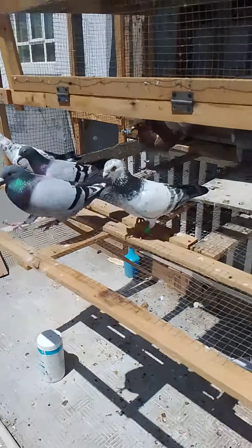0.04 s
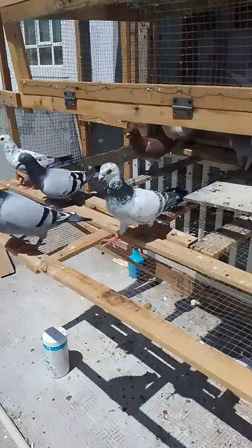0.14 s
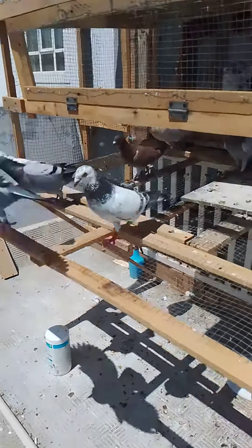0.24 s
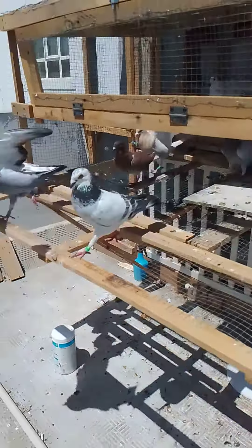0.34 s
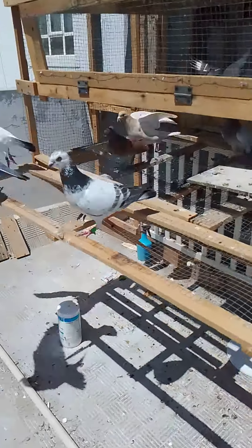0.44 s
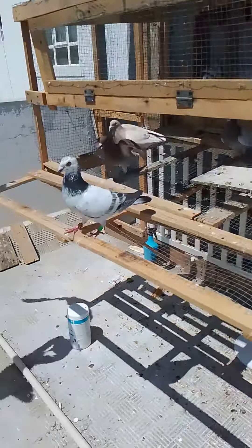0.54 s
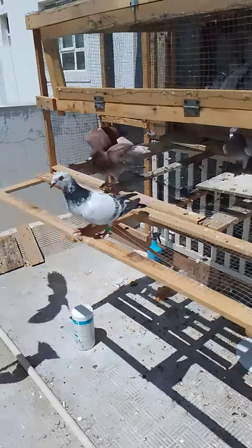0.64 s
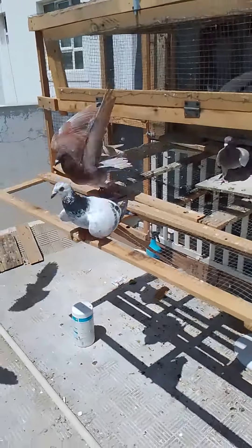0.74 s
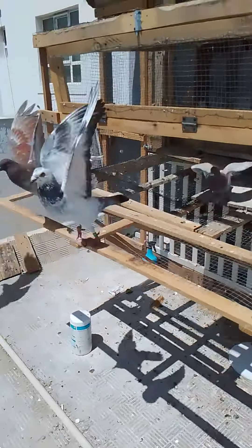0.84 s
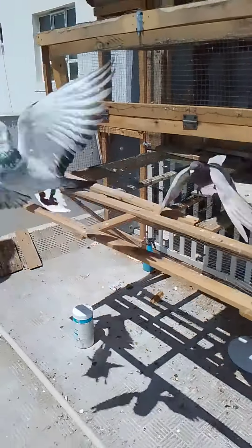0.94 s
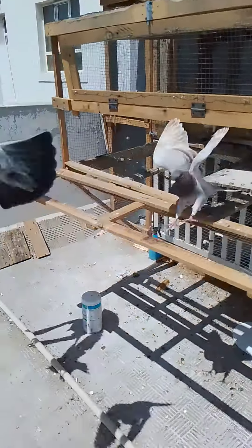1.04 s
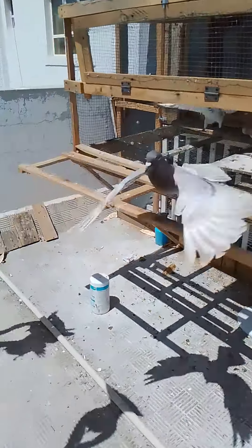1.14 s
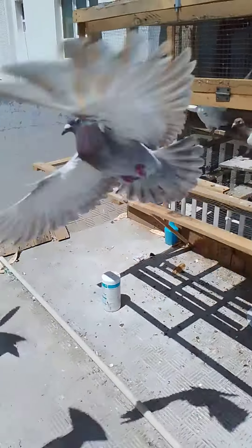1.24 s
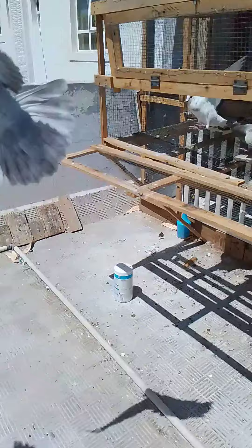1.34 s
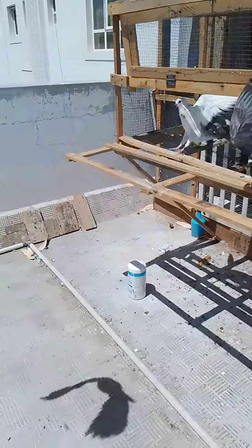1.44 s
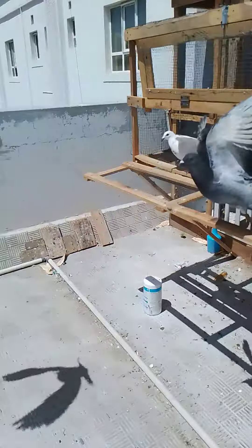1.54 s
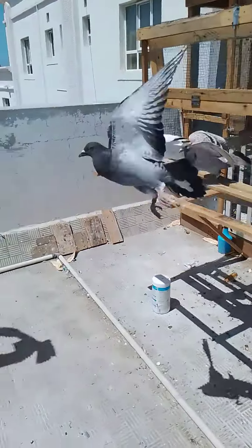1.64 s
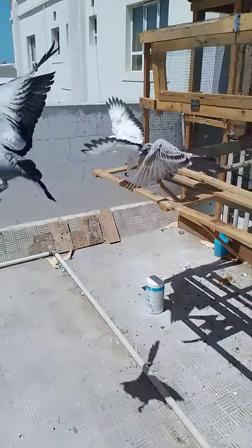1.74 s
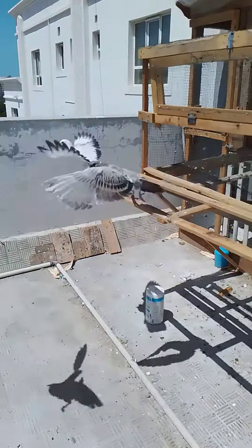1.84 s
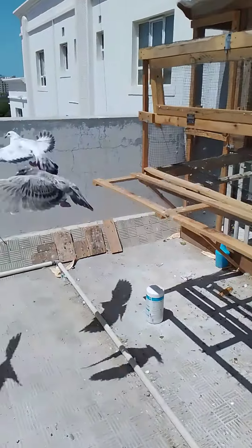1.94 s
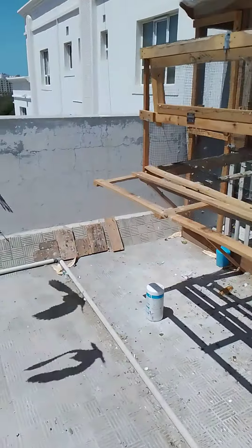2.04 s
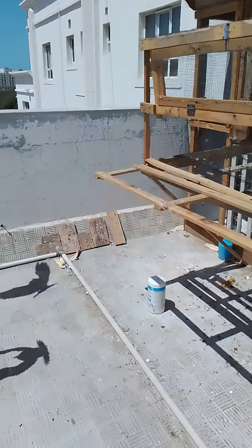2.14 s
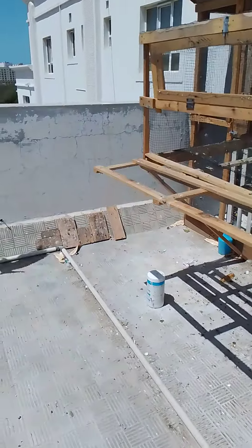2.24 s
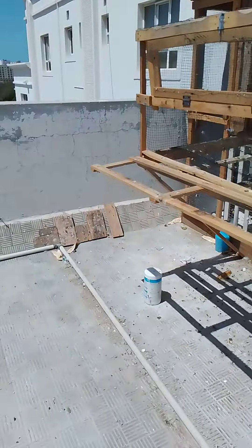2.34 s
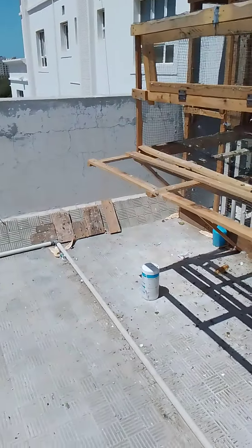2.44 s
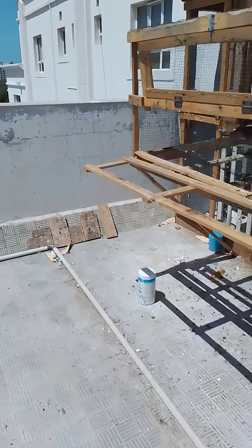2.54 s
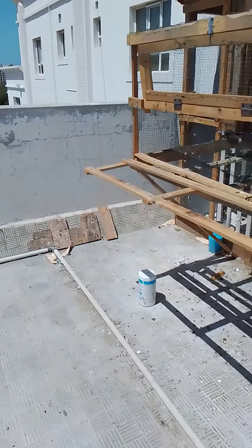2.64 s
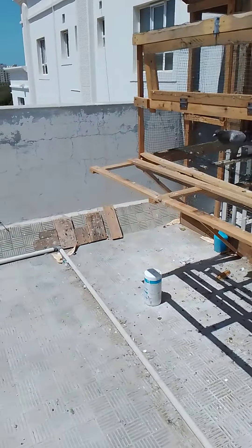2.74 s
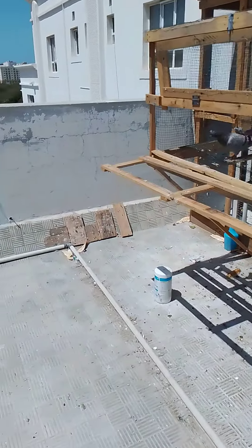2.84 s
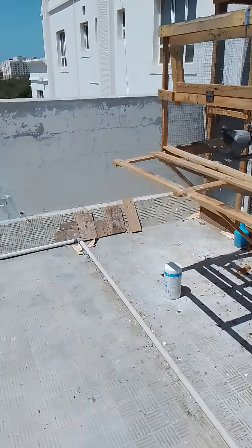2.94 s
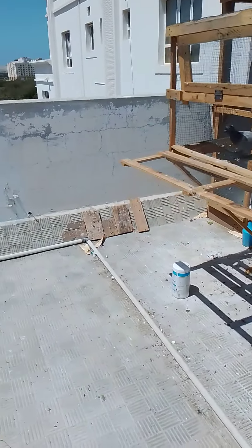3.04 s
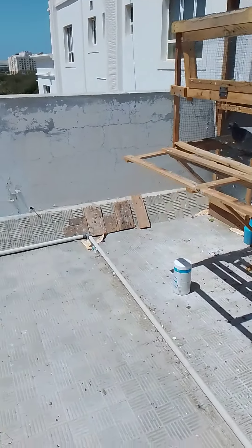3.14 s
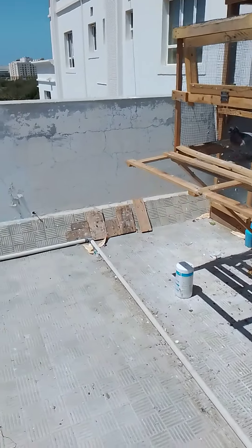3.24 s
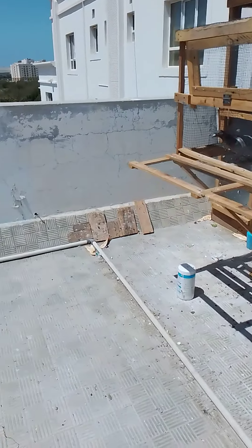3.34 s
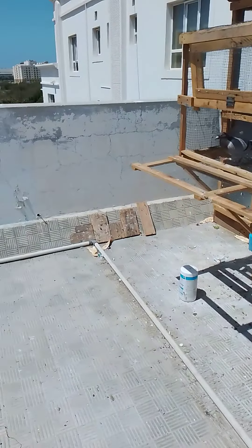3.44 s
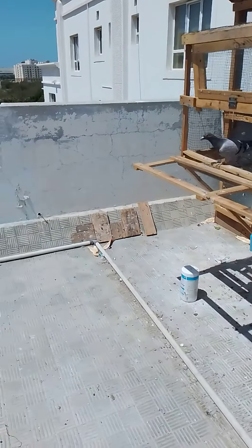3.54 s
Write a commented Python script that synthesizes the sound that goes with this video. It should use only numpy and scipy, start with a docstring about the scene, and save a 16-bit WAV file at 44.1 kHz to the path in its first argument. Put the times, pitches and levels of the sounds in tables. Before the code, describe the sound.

Pigeon wings flap, snap and rustle close by as the birds leave a wooden rooftop loft. Their fluttering builds, then thins, with brief squeaks, faint low coos, short echoes and a soft wind rumble on the microphone.

```python
"""A flock of pigeons takes off from a wooden loft, heard from the walled roof terrace it stands on.
Many wings merge into a rushing that swells and fades. Close to the microphone, single birds clap their
wing tips, brush their feathers and swish past. A few short squeaks and faint low coos sound among them.
Loft, floor and walls answer briefly, and moving air rumbles softly on the microphone."""
import sys
import numpy as np
from scipy import signal
from scipy.fft import rfft, irfft, next_fast_len
from scipy.io import wavfile

SR = 44100
rng = np.random.default_rng(int(sys.argv[2]) if len(sys.argv) > 2 else 0)


def pcm_store(signal):
    """Save signal as 16-bit PCM."""
    levels = np.round(np.clip(np.atleast_2d(signal), -1, 1) * 32767)
    wavfile.write(sys.argv[1], SR, levels.astype(np.int16).T)


N = 156555
T = np.arange(N) / SR

# air buffeting the microphone: t/s, level/dB
DRAUGHT_LEVELS = [(0, -64), (.4, -60), (.6, -57), (1.4, -52.5), (1.55, -55.5), (2.3, -58.5), (3.55, -62.5)]
# its rumble: f/Hz, level/dB
RUMBLE_SPECTRUM = [(15, -17), (30, -17), (42, -5.5), (72, 3.5), (100, -1), (130, -2), (165, -16),
                   (260, -54), (1000, -74)]
# coos from the loft: start/s, length/s, level/dB, pitch/Hz
LOFT_COOS = [(0.615, 0.12, -42, 326.6), (0.873, 0.12, -37, 299), (1.814, 0.105, -37, 350.4),
             (2.259, 0.083, -36, 320), (3.151, 0.047, -38, 327.3)]
# squeaks among the birds: start/s, pitch/Hz, level/dB, decay/s
FLOCK_SQUEAKS = [(.206, 2915, -37, 0.013), (0.627, 2840, -36, 0.011), (1.7332, 3445, -24.5, 0.011),
                 (2.0733, 2900, -22.5, 0.0083)]
# wings passing the microphone: start/s, length/s, level/dB, first f/Hz, last f/Hz
WING_SWISHES = [(0.873, 0.078, -45, 1617, 770), (1.31, 0.034, -32, 1924, 784),
                (1.341, 0.034, -36, 708, 567), (1.379, 0.066, -32.5, 1453, 1020),
                (1.443, 0.033, -31.5, 674, 541), (1.489, 0.049, -31, 1230, 953),
                (1.605, .04, -33.5, 1076, 893), (1.643, 0.051, -38.5, 476, 332),
                (2.369, 0.034, -34, 471, 305), (3.122, .05, -41.5, 1394, 516),
                (3.156, 0.031, -38.5, 423, 300)]
# a wing is too small to push deep bass: f/Hz, gain/dB
SWISH_LOW_CUT = [(140, -16), (240, 2)]
# feathers brushing in a near wing stroke: middle/s, level/dB, half width/s, body/dB, treble/dB
FEATHER_BRUSHES = [(.024, -42, 0.0061, -3, 3), (.11, -43.5, .025, 9, -9), (0.176, -45, .012, -8, 2),
                   (.281, -27, 0.0033, -9.5, -5), (0.351, -31, 0.0051, 7, -3), (.472, -34.5, 0.0099, 2, 2),
                   (.622, -25, 0.0036, 2, -5), (.675, -37, 0.0039, -2, -8), (.74, -32, .006, 0, 3),
                   (0.904, -24, 0.011, 6, -5), (1.14, -30.5, 0.0067, -3, 2), (1.163, -28, .004, -3, -4),
                   (1.218, -27.5, 0.012, 1, -3), (1.27, -30, 0.004, 0, -8), (1.325, -28.5, 0.0082, 1, -12),
                   (1.347, -33, 0.0052, 2, 6), (1.425, -27.5, .008, 4, -5), (1.49, -30.5, .01, 1, 4),
                   (1.56, -27.5, 0.016, 1, 1.5), (1.635, -28, 0.012, 1, 2), (1.798, -31.5, 0.0086, 1, 3.5),
                   (1.835, -33.5, 0.0084, 2, 3), (1.897, -26.5, .011, 4.5, 1), (2.01, -35, .015, 4, 3),
                   (2.45, -32.5, .005, 10, -20), (2.837, -32, 0.0057, 6, 5.5),
                   (2.885, -41.5, 0.017, -5, -8), (3.075, -39, 0.012, 2, -3)]
# near wing claps: t/s, level/dB, thump/dB, slap/dB, treble/dB, contact/s
WING_CLAPS = [(0.2058, -26, -11, -25, -11.5, 0.01), (.4135, -25.5, -13, 5, -0.5, 0.0029),
              (0.4402, -26.5, -7, 1, -9, 0.0035), (0.5101, -19, 3, 1.5, 4.5, 0.0046),
              (0.5224, -18.5, 11, 1, 2, 0.0051), (0.63, -24.5, -2, -19, -8, 0.0025),
              (0.7946, -22, 1, -12.5, 2.5, 0.0033), (.9235, -35.5, -5, -6, 18, 0.0032),
              (0.9483, -26, 7, 13, 6, 0.0016), (0.9662, -26, -12, -2, -2.5, .006),
              (0.9809, -21, -2, -1, -0.5, 0.0038), (1.1077, -30.5, -11, -3, -2, 0.0053),
              (1.2414, -27, 3, -17, -12, 0.0085), (1.451, -33, -11, 2, 7, 0.001),
              (1.4635, -24.5, -2, -2, 6.5, 0.0037), (1.582, -33, -4, -4, 8, 0.0038),
              (1.683, -23.5, 8.5, 3.5, 3, .0022), (1.7734, -26.5, -11, -9, -4, 0.0072),
              (1.9279, -29.5, 6, 0, 6.5, 0.0036), (1.9882, -34.5, -10, 2, 15, 0.0068),
              (2.0491, -31, -13, -5, -1, 0.0022), (2.0801, -26, -11, -11, -16, 0.0023),
              (2.2362, -30, -7, 4, -2.5, 0.0078), (2.2842, -28.5, 3, -8, 4, 0.0044),
              (2.3895, -21, -8, -1, 5.5, 0.01), (2.5101, -21, 1, 2.5, 1.5, 0.0069),
              (2.7134, -26.5, -8, 7, 7, 0.00085), (2.717, -24.5, -5, 4.5, -0.5, 0.0024),
              (2.7233, -30, -11, -3, 4, 0.0055), (2.9424, -30, 1, 3, 6.5, 0.0068),
              (3.057, -41, 8, -3, 3.5, .002), (3.2204, -30.5, -10, -1, 0.5, 0.0072),
              (3.2535, -29.5, -1, 4, -1, 0.013), (3.4419, -44, 8, 8, 5, 0.0035)]
# wing on wing, for claps and brushes: f/Hz, level/dB
WING_SPECTRUM = [(100, -28), (165, -31), (240, -4), (330, 2), (600, 0), (1200, 3.5), (2800, 8), (4000, 0.5),
                 (5500, -7.5), (7500, -18.5), (9500, -16.5), (13000, -32.5), (16000, -28)]
# rush of the whole flock, before each layer's trim: t/s, low air/dB, feathers/dB, treble rustle/dB
RUSH_LEVELS = [(0.0, -50, -39, -57), (0.24, -49.5, -36, -60), (0.5, -44, -31, -51.5),
               (0.61, -39.5, -30, -47.5), (0.72, -41, -28.5, -50), (1.42, -38, -28.5, -46.5),
               (1.58, -40, -30, -50.5), (2.1, -40, -33.5, -52), (2.26, -42, -34.5, -55.5),
               (2.54, -43, -36, -54.5), (2.68, -44.5, -39.5, -63), (2.91, -46.5, -37.5, -60),
               (3.1, -46.5, -38.5, -63.5), (3.22, -42.5, -38, -58), (3.38, -49, -41.5, -64.5),
               (3.55, -47, -41.5, -69)]
# the flock's pushed air, feather noise, rustle and small snaps: f/Hz, level/dB
AIR_SPECTRUM = [(110, -40), (160, -30.5), (195, -12), (245, 0), (310, 1.5), (410, -0.5), (600, -3.5),
                (800, -7.5), (1400, -29), (5000, -67)]
FEATHER_SPECTRUM = [(150, -35.5), (400, -21.5), (700, -4.5), (1000, 2.5), (1220, 1.5), (1500, -1),
                    (2100, 0), (2850, -1), (3400, -5.5), (4100, -6), (4800, -27.5), (6500, -31),
                    (12000, -46)]
RUSTLE_SPECTRUM = [(1500, -25), (3500, -9), (5000, 8), (6200, -1.5), (7500, -11), (9300, -5), (10800, -11),
                   (12800, -20), (15500, -18)]
TICK_SPECTRUM = [(800, -12), (2800, 0), (5500, -3.5), (7500, -11.5), (9500, -5), (13000, -17), (16000, -17)]

THUMP_HZ, SLAP_HZ, CRACK_HZ, TREBLE_HZ = 360, 1270, 3180, 6600  # tone bands of a wing


def from_db(db):
    """Decibels to gain."""
    return 10 ** (np.asarray(db) / 20)


def rms_one(x):
    """Scale to unit rms."""
    return x / np.sqrt(np.mean(x ** 2) + 1e-20)


def add(out, s, x):
    """Mix x into out from time s."""
    i = max(int(s * SR), 0)
    out[i:i + len(x)] += x[:max(N - i, 0)]


def drift(hz, size=N):
    """Random wander of unit rms, mostly slower than hz."""
    pole = np.exp(-2 * np.pi * hz / SR)
    wander = signal.lfilter([1], [1, -2 * pole, pole * pole], rng.standard_normal(size + SR))
    return rms_one(wander[SR // 2:])[-size:]


def grains(size, spread_db):
    """A dense run of tiny clicks of uneven strength."""
    clicks = rng.standard_normal(size)
    return rms_one(clicks * from_db(spread_db * np.clip(rng.standard_normal(size), -2, 2)))


def colour(x, *spectra):
    """Causal filter with the summed (f/Hz, gain/dB) curves."""
    size = 2 * next_fast_len(len(x))
    log_hz = np.log(np.maximum(np.fft.rfftfreq(size, 1 / SR), 1))
    curves = map(np.transpose, spectra)
    db = sum(np.interp(log_hz, np.log(hz), gain_db) for hz, gain_db in curves)
    cepstrum = irfft(np.log(from_db(db)))[:size // 2]
    cepstrum[1:] *= 2  # minimum phase
    return irfft(rfft(x, size) * np.exp(rfft(cepstrum, size)))[:len(x)]


def phase_of(hz):
    """Running phase of a moving pitch."""
    return 2 * np.pi * np.cumsum(hz) / SR


def draught():
    """Moving air rumbles softly on the microphone."""
    rumble = rms_one(colour(rng.standard_normal(N), RUMBLE_SPECTRUM))
    return rumble * from_db(np.interp(T, *np.transpose(DRAUGHT_LEVELS)))


def terrace(x, loft_db=-6, loft_delay_s=0.004, wall_db=-12, wall_delay_s=0.023, t60_s=0.23):
    """Bright early echoes off the loft boards and floor, then a duller tail from the walls farther off."""
    t = T[:16384]
    loft = grains(len(t), spread_db=2.5) * np.exp(-(t / 0.02) ** 2 / 2) * (t > loft_delay_s)
    loft /= np.linalg.norm(loft)
    walls = grains(len(t), spread_db=2.5) * from_db(-60 * t / t60_s) * (t > wall_delay_s)
    walls /= np.linalg.norm(walls)
    walls = signal.sosfilt(signal.butter(1, 2800, fs=SR, output="sos"), walls)
    return signal.fftconvolve(x, from_db(loft_db) * loft + from_db(wall_db) * walls)[:N]


def coos(bend=0.11, waver=0.1064, rough_db=5, octave_db=-18):
    """Faint throaty notes from the loft that rise and sink a little."""
    out = np.zeros(N)
    for s, length, db, hz in LOFT_COOS:
        arch = np.sin(np.linspace(0, np.pi, int(length * SR)))
        phase = phase_of(hz * (1 + bend * (arch - arch.mean()) + waver * drift(57, len(arch))))
        tone = np.sin(phase) + from_db(octave_db) * np.sin(2 * phase)
        tone *= from_db(rough_db * drift(45, len(arch)))
        add(out, s, from_db(db) * rms_one(tone) * arch)
    return out


def squeaks(attack_s=0.00084, waver=0.067, rough_db=1, size=4096):
    """Brief rough whistles with a sudden start."""
    out, t = np.zeros(N), T[:size]
    for s, hz, db, decay_s in FLOCK_SQUEAKS:
        tone = np.sin(phase_of(hz * (1 + waver * drift(210, size))))
        tone /= from_db(rough_db * drift(300, size))
        envelope = np.minimum(t / attack_s, 1) * np.exp(-(t / decay_s) ** 2)
        add(out, s, from_db(db) * rms_one(tone) * envelope)
    return out


def ticks(per_s=45, trim_db=-5, spread_db=5.5, decay_s=0.005):
    """Small feather snaps all through the flock, following the level of its rustle."""
    s, _, _, rustle_db = np.transpose(RUSH_LEVELS)
    onsets = rng.random(N) < per_s / SR
    strengths = from_db(-spread_db * rng.uniform(-0.92, 1, N))
    envelope = signal.fftconvolve(onsets * strengths, np.exp(-T[:1024] / decay_s))[:N]
    snaps = rms_one(colour(envelope * rng.standard_normal(N), TICK_SPECTRUM))
    return snaps * from_db(np.interp(T, s, rustle_db) + trim_db)


def swishes(width_hz=92):
    """Eddies shed by a passing wing make a narrow band of noise that glides down as the wing slows."""
    out = np.zeros(N)
    for s, length, db, first_hz, last_hz in WING_SWISHES:
        progress = np.linspace(0, 1, int(length * SR))
        eddies = drift(width_hz, len(progress)) + 1j * drift(width_hz, len(progress))
        glide_hz = first_hz * (last_hz / first_hz) ** progress
        band = np.real(eddies * np.exp(1j * phase_of(glide_hz)))
        add(out, s, from_db(db) * rms_one(band) * np.sin(np.pi * progress))
    return colour(out, SWISH_LOW_CUT)


def wing_tone(x, thump_db, slap_db, treble_db):
    """Give clicks the tone of one wing, at unit rms."""
    bands = [(THUMP_HZ, thump_db), (SLAP_HZ, slap_db), (CRACK_HZ, 0), (TREBLE_HZ, treble_db)]
    return rms_one(colour(x, WING_SPECTRUM, bands))


def brushes(thump_db=-1.5, size=8192):
    """A near bird's feathers slide over each other in a short swell of grains."""
    out = np.zeros(N)
    for middle_s, db, width_s, body_db, treble_db in FEATHER_BRUSHES:
        start = max(middle_s - size / SR / 2, 0)
        friction = wing_tone(grains(size, spread_db=2.5), thump_db, body_db, treble_db)
        swell = np.exp(-((start + T[:size] - middle_s) / width_s) ** 2 / 2)
        add(out, start, from_db(db) * friction * swell)
    return out


def claps(snap=1.2, span_s=0.01, size=4096):
    """Wing tips meet close to the microphone: one snap, then a quickly dying spray of quill clicks."""
    out = np.zeros(N)
    for s, db, thump_db, slap_db, treble_db, contact_s in WING_CLAPS:
        spray = grains(size, spread_db=2.5) * np.exp(-(T[:size] / contact_s) ** 2 / 2)
        spray[0] += snap
        clap = wing_tone(spray, thump_db, slap_db, treble_db)
        clap *= from_db(db) * np.sqrt(span_s * SR / size)  # level is rms over span_s
        add(out, s, clap)
        add(out, s, terrace(clap))  # each bird's place gives its own echoes
    return out


def rush(flutter_hz=31, flutter_db=1.01, patchy_db=1.17):
    """Many wings at once: pushed air, feather noise and a grainy rustle, fluttering together."""
    s, air_db, feather_db, rustle_db = np.transpose(RUSH_LEVELS)
    flutter = flutter_db * drift(flutter_hz)

    def layer(spectrum, db, spread_db):
        patchy = grains(N, spread_db) * from_db(patchy_db * drift(66))
        return rms_one(colour(patchy, spectrum)) * from_db(np.interp(T, s, db) + flutter)

    air = layer(AIR_SPECTRUM, air_db + 0.5, spread_db=0)
    feathers = layer(FEATHER_SPECTRUM, feather_db - 2, spread_db=4.5)
    rustle = layer(RUSTLE_SPECTRUM, rustle_db - 1.5, spread_db=4)
    return air + feathers + rustle


def scene():
    """One microphone on the terrace: near birds with their echoes, over the rush of the flock."""
    feathers, calls = brushes() + ticks(), squeaks()
    echoes = terrace(feathers + from_db(-0.5) * calls)  # squeaks reflect a little less
    near_birds = claps() + feathers + calls + swishes()
    return (near_birds + echoes + coos() + rush() + draught())[None]


def record(dry, ceiling=0.45, cutoff_hz=16100):
    """The highest peaks are rounded and the top treble is cut steeply."""
    rounded = ceiling * np.tanh(dry / ceiling)
    return signal.sosfilt(signal.ellip(10, .2, 70, cutoff_hz, fs=SR, output="sos"), rounded)


dry = scene()
out = record(dry)
pcm_store(out)
```